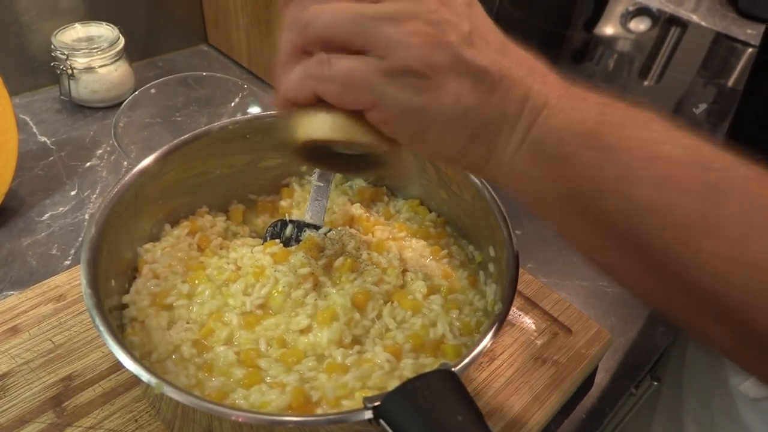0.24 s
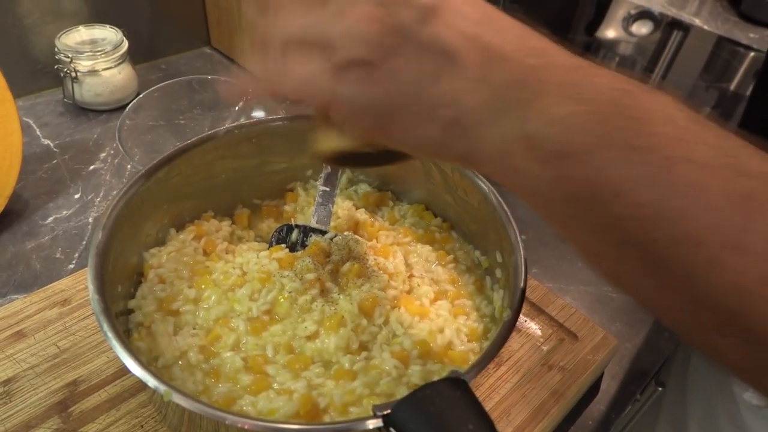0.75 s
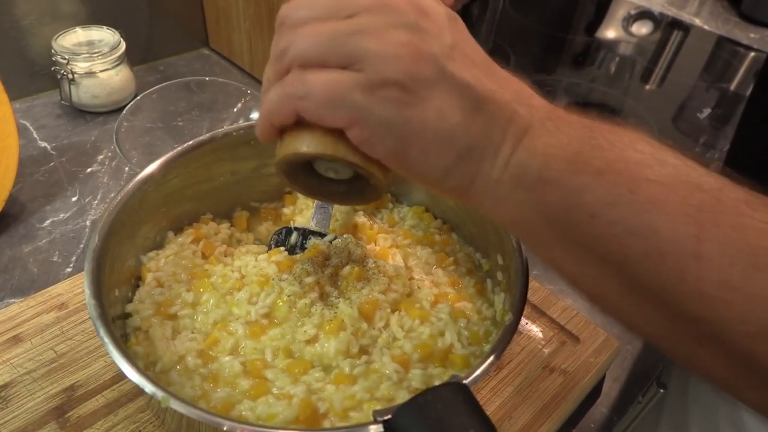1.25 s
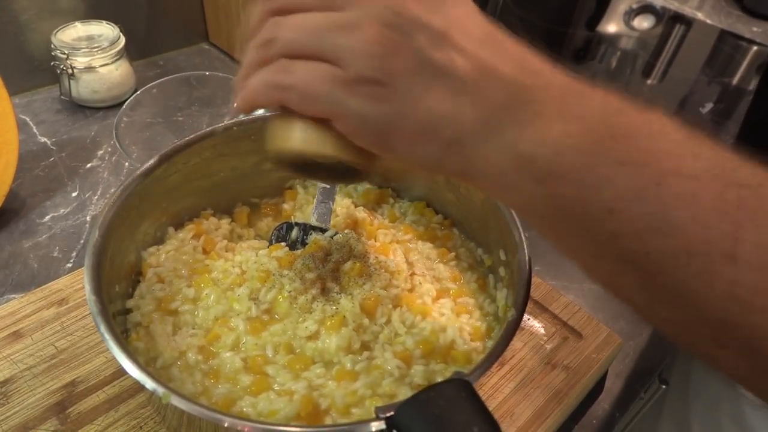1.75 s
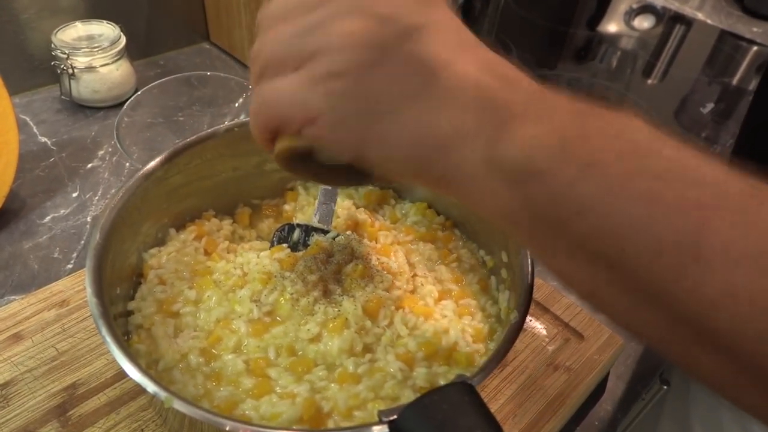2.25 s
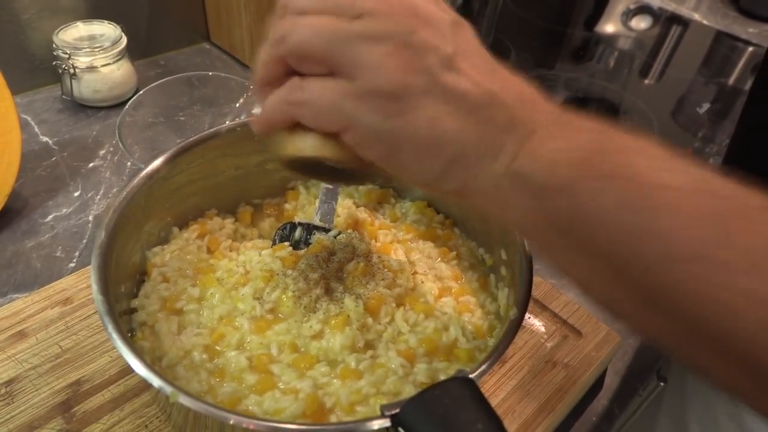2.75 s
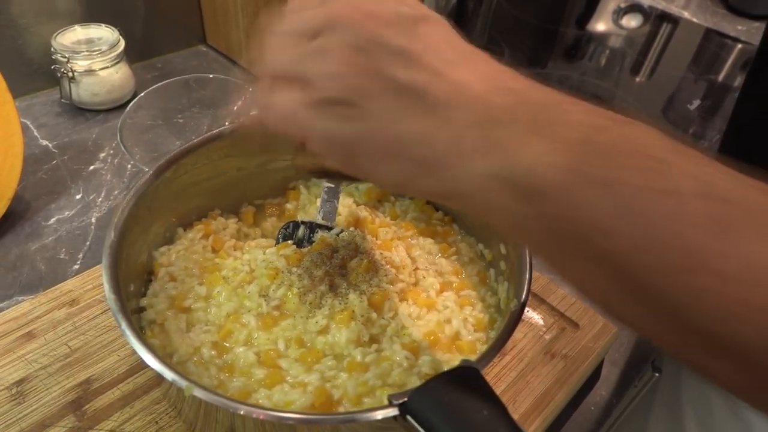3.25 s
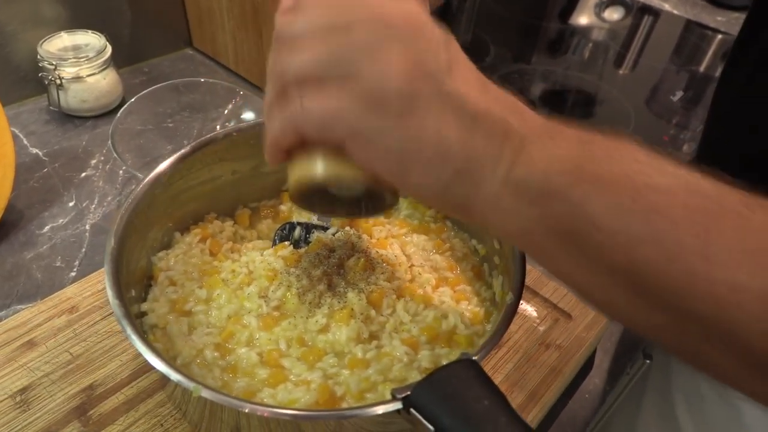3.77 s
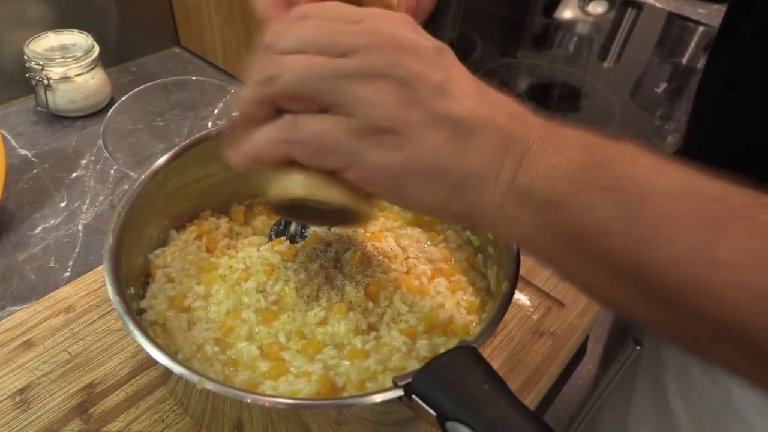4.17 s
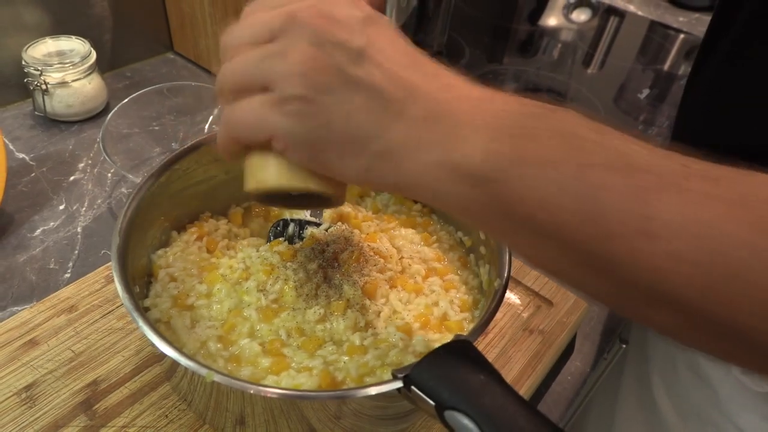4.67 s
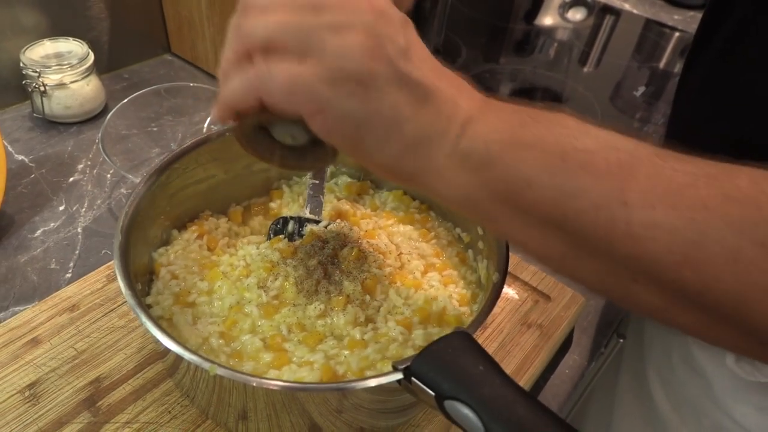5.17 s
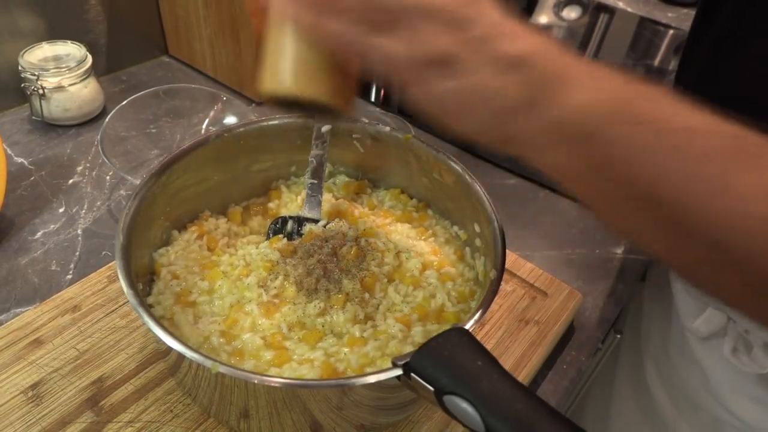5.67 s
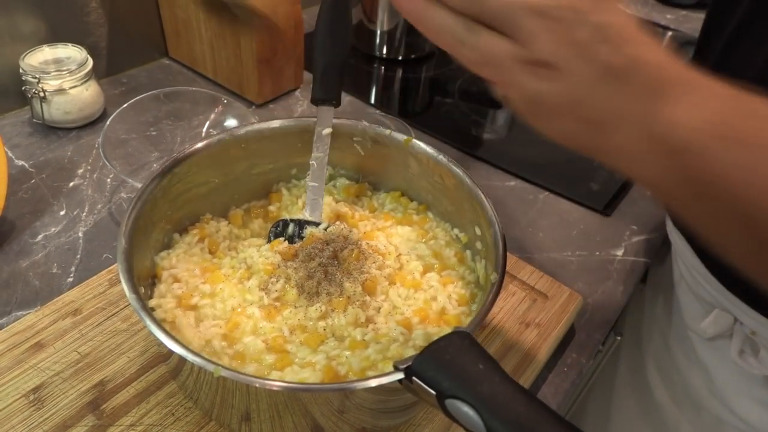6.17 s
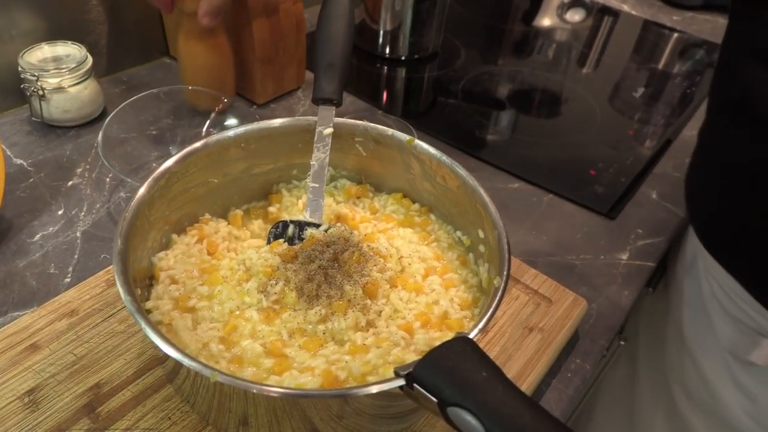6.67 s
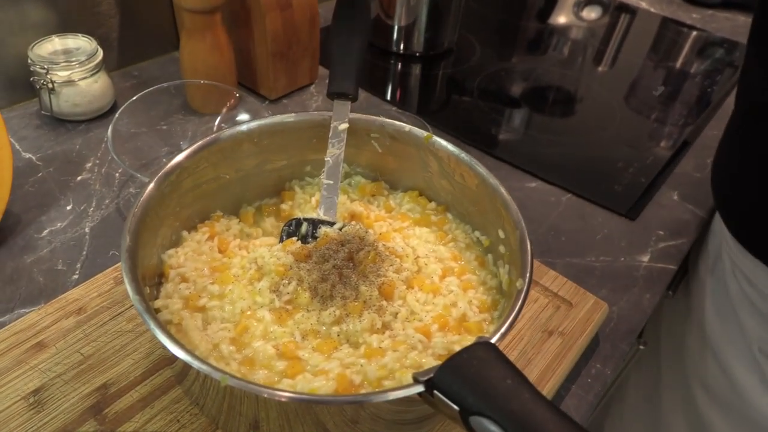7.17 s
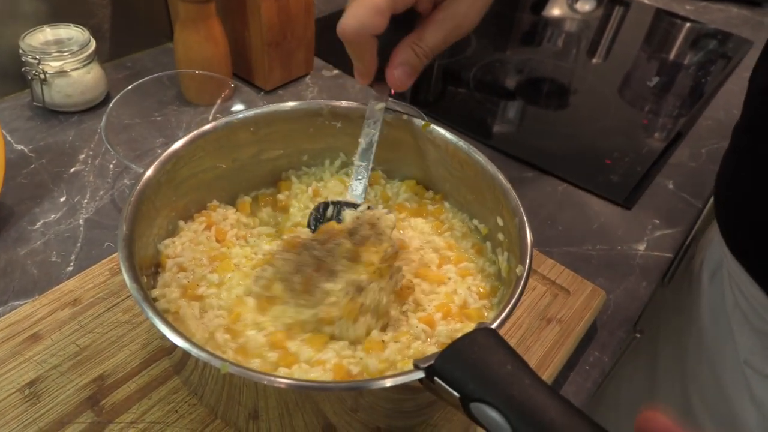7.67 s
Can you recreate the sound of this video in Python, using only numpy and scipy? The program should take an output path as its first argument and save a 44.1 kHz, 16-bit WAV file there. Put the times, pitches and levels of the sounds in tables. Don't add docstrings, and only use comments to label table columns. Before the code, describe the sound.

In a small hard-surfaced kitchen with very faint appliance hum and hiss, a wooden pepper mill is worked close to the microphones. From 0.1 to 5.6 seconds come sixteen short twists, roughly one every 0.35 seconds, each a dry mid-high crunch under a tenth of a second: peppercorns cracking, burr and wood ringing briefly, uneven sharp snaps and tiny treble ticks. Between twists there is a light fingertip tick and a soft rustle as the hand slides back. At 5.9 and 6.05 two soft, low palm pats make the corns rattle. After a pause, the mill's edge touches the counter at 6.6 with a woody tap, then the base lands at 6.8 with a hard, hollow knock, the loudest event, and rocks softly at 7.0. From 7.37 to 7.8 a spoon scrapes through wet rice in two pushes, with light taps and small sticky pops.

```python
import sys
import numpy as np
from scipy import signal
from scipy.fft import rfft, irfft, next_fast_len
from scipy.io import wavfile

SR = 44100
rng = np.random.default_rng(int(sys.argv[2]) if len(sys.argv) > 2 else 0)


def generate_wav(sig):
    pcm = np.round(np.clip(np.atleast_2d(sig).T, -1, 1) * 32767).astype(np.int16)
    wavfile.write(sys.argv[1], SR, pcm)


def magnitude_from_level(level_db):
    exponent = np.asarray(level_db, float) / 20
    return 10 ** exponent


N = 349051


def unit(x):
    return x / np.sqrt(np.mean(x ** 2) + 1e-20)


def along(points, hz):
    f, v = np.transpose(points)
    return np.interp(np.log(hz + 1), np.log(f + 1), v)


def filtered(x, response):
    m = next_fast_len(N + SR // 2)
    return irfft(rfft(x, m) * response(np.fft.rfftfreq(m, 1 / SR)), m)[..., :N]


def colour(points):
    def response(hz):
        cep = irfft(np.log(magnitude_from_level(along(points, hz))))
        cep[1:len(cep) // 2] *= 2
        cep[len(cep) // 2 + 1:] = 0
        return np.exp(rfft(cep))
    return response


def ring(modes):
    def response(f):
        total = 0
        for k, (centre, width, db) in enumerate(modes):
            damping = 1j * f * width
            total = total + (-1) ** k * magnitude_from_level(db) * damping / (centre * centre - f * f + damping)
        return total
    return response


def train(times, sizes):
    at = np.clip(times * SR, 0, N - 1).astype(int)
    return np.bincount(at.ravel(), sizes.ravel(), N)


def crackle(rate, spread_db):
    draw = rng.random((3, N))
    sign = np.sign(draw[1] - .5)
    return unit((draw[0] < rate / SR) * sign * magnitude_from_level(-spread_db * np.log(draw[2] + 1 / 20)))


def crackle_pair(rate, spread_db):
    return [crackle(rate, spread_db) for _ in "LR"]


def push(s, ms):
    u = np.maximum(np.arange(N) / SR - s, 0) * 1000 / ms
    return u ** 2 * np.exp(2 - 2 * u)


# frequency in Hz, gain in dB.
SPLINTER = [(2500, -57.5), (3700, -2), (4600, -3.5), (6000, -6.5), (8000, -8.5), (11000, -12), (14000, -24),
            (16500, -28)]


def ticks(times, dbs, tones_hz, tone, gain_db, life_s, spectrum=SPLINTER):
    out, t = np.zeros((2, N + SR)), np.arange(800) / SR
    for s, db, hz in zip(times, dbs, tones_hz):
        snap = tone * np.sin(2 * np.pi * hz * t) + rng.standard_normal((2, len(t)))
        start = round(s * SR)
        out[:, start:start + len(t)] += magnitude_from_level(db + gain_db) * snap * t / life_s * np.exp(-t / life_s)
    return filtered(out[:, :N], colour(spectrum))


# frequency in Hz, density in dB per Hz.
AIR_SPECTRUM = [(15, -30), (25, 3.5), (40, -25), (70, -11.5), (120, -4), (160, 8.5), (190, -9), (300, -1),
                (500, -3.5), (900, -10), (2200, -14.5), (5000, -24), (10500, -28), (16000, -42)]
# frequency in Hz, left over right in dB.
AIR_BALANCE = [(60, 20), (180, -4.5), (550, -4), (1650, -14.5), (4970, -8), (15000, 4)]
# frequency in Hz, left-right correlation.
AIR_ALIKE = [(30, -1.04), (70, -0.29), (240, 0.67), (950, 0.51), (3770, -0.22), (15000, 0.15)]
AIR_DB = -60.5


def air():
    def mid_side(hz):
        angle = np.arccos(np.clip(along(AIR_ALIKE, hz), -1, 1)) / 2
        return magnitude_from_level(along(AIR_SPECTRUM, hz)) * [np.cos(angle), np.sin(angle)]
    mid, side = filtered(rng.standard_normal((2, N)), mid_side)
    pair = filtered([mid + side, mid - side], lambda hz: magnitude_from_level(along(AIR_BALANCE, hz) * [[.5], [-.5]]))
    return magnitude_from_level(AIR_DB + 2.0) * unit(pair)


# frequency in Hz, t60 in seconds.
KITCHEN_T60 = [(100, 0.041), (400, 0.45), (1500, 0.62), (4000, 0.5), (10000, 0.6)]
# frequency in Hz, level in dB.
ROOM_LEFT = [(100, -4.5), (400, -14.5), (1000, -12.5), (2500, -12.5), (8000, -19)]
ROOM_RIGHT = [(100, -12), (400, -7), (1000, -6.5), (2500, -4), (8000, -11)]
# frequency in Hz, left-right correlation.
ROOM_ALIKE = [(250, 1), (500, 0.73), (1000, 0.25), (2000, 0.055)]


def room(x):
    size, hop = 512, 128
    hz, _, heard = signal.stft(x, SR, nperseg=size, noverlap=size - hop)
    power = np.mean(np.abs(heard) ** 2, axis=0)
    keep = magnitude_from_level(-120 * hop / SR / along(KITCHEN_T60, hz))
    power = np.array([signal.lfilter([1 - k], [1, -k], p) for k, p in zip(keep, power)])
    z = signal.stft(rng.standard_normal((2, N)), SR, nperseg=size, noverlap=size - hop)[2]
    alike = np.clip(along(ROOM_ALIKE, hz), 0, 1)[:, None]
    rms = np.sqrt(np.mean(np.abs(z) ** 2))
    z = np.array([z[0], alike * z[0] + np.sqrt(1 - alike ** 2) * z[1]]) / rms
    wet = signal.istft(z * np.sqrt(np.abs(power)), SR, nperseg=size, noverlap=size - hop)[1]
    wet = np.pad(wet, ((0, 0), (size // 2, 0)))[:, :N]
    return filtered(wet, lambda hz: magnitude_from_level([along(ROOM_LEFT, hz), along(ROOM_RIGHT, hz)]))


# time in seconds, drag in dB.
STIR = [
    (7.368, -50.5),
    (7.387, -48.5),
    (7.415, -54.5),
    (7.49, -57),
    (7.55, -63),
    (7.62, -69),
    (7.66, -55),
    (7.721, -59.5),
    (7.79, -73),
]
# time in seconds, peak in dB, pitch in Hz.
POPS = [(7.402, -43, 7000), (7.4693, -34, 5640), (7.4705, -41, 7860), (7.473, -38, 2300),
        (7.524, -32.5, 4330), (7.5798, -30.5, 4900), (7.645, -39, 4830), (7.6455, -53, 8000),
        (7.654, -37, 1900), (7.6645, -43, 10000), (7.698, -52, 8100), (7.719, -41, 5760),
        (7.727, -43, 6100), (7.821, -44, 4380)]
# frequency in Hz, width in Hz, gain in dB.
SPOON = [(247, 160, 6.5), (650, 570, 4.5), (2150, 970, 6), (3030, 1900, -7.5)]
# frequency in Hz, gain in dB.
WET = [(1000, -11), (2000, -5.5), (8000, -8), (16000, -20)]
FIZZ_DB = -18


def stir():
    s, db = np.transpose([(STIR[0][0] - .01, -120)] + STIR + [(N / SR, -90)])
    scrape_db = np.interp(np.arange(N) / SR, s, db, right=-120)
    scrape = filtered(crackle_pair(900, spread_db=4.0), ring(SPOON))
    fizz = filtered(crackle_pair(1200, spread_db=5.0), colour(SPLINTER))
    drag = magnitude_from_level(scrape_db - 4.0) * unit(scrape) + magnitude_from_level(scrape_db + FIZZ_DB + 2.5) * unit(fizz)
    return drag + ticks(*np.transpose(POPS), tone=3.0, gain_db=-2.5, life_s=0.00042, spectrum=WET)


# time in seconds, level in dB, contact in ms, click in dB.
KNOCKS = [
    (6.602, -23.5, 0.45, -15.5),
    (6.8113, -11.5, 0.27, -42),
    (6.8136, -14.5, 0.24, -50),
    (6.6045, -46, 0.28, 6),
    (6.993, -30.5, 0.43, -71),
    (7.368, -46, 0.42, -26),
    (7.642, -50.5, 0.21, -30),
    (7.582, -54, 0.19, -27),
    (7.654, -52, 0.14, -10),
]
# frequency in Hz, width in Hz, gain in dB.
COUNTER = [(96, 17, -12), (166, 27, -11), (364, 18, 8.5), (442, 27, 7.5), (574, 42, 6.5), (660, 42, 5.5),
           (780, 80, -1), (1010, 73, -0.5), (1323, 116, 2), (1600, 240, 2), (2200, 270, -3),
           (2900, 430, -13)]
# frequency in Hz, width in Hz, gain in dB.
TILTED = [(180, 40, -0.5), (305, 44, 3), (462, 36, 7), (624, 66, 4.5), (845, 130, -1.5), (1270, 170, -6)]
# frequency in Hz, width in Hz, gain in dB.
RIM = [(2100, 300, -3.5), (2900, 410, 3.5), (3300, 690, 3), (4150, 500, -2.5), (6940, 6400, -9.5)]
# time in seconds, level in dB.
HOLLOW = [
    (6.8114, -12),
    (6.993, -3),
    (7.368, -34),
]


def knocks():
    touch, *flat = [magnitude_from_level(db) * push(s, ms) for s, db, ms, _ in KNOCKS]
    body = filtered(sum(flat), lambda f: sum(ring([mode])(f) for mode in COUNTER))
    body = body - filtered(touch, ring(TILTED))
    click = sum(magnitude_from_level(db + click_db + 25.0) * push(s, 0.052) for s, db, _, click_db in KNOCKS)
    hit = magnitude_from_level(15) * filtered(body, lambda f: (1j * f / (270 + 1j * f)) ** 2) + filtered(click, ring(RIM))
    settle = sum(magnitude_from_level(db) * push(s, 0.68) for s, db in HOLLOW)
    hit += filtered(settle, lambda f: ring([(355, 28, 0)])(f) ** 2)
    splash = sum(magnitude_from_level(db + click_db / 2 - 0.5) * push(s, 1.3) for s, db, _, click_db in KNOCKS)
    hit += filtered(splash * rng.standard_normal(N), colour(SPLINTER))
    return early_echoes(hit)


def early_echoes(hit):
    late_s = np.sort(rng.uniform(0.005, .05, 24)) + rng.normal(0, 0.00028, (2, 24))
    echo = rng.choice([-1, 1], 24) * magnitude_from_level(-7.5 - 470 * late_s)
    edge = filtered(hit, lambda f: (1j * f / (550 + 1j * f)) ** 2)
    return hit + [signal.fftconvolve(edge, train(s, g)[:SR // 10])[:N] for s, g in zip(late_s, echo)]


# time in seconds, level in dB, contact in ms, rattle in dB.
PATS = [
    (5.8826, -33, 1.64, -37.5),
    (6.035, -32, 2, -43),
]
# frequency in Hz, width in Hz, gain in dB.
PALM = [(27.6, 8.2, -2), (92, 46, -1), (337, 1100, -7), (720, 120, 6)]
# frequency in Hz, gain in dB.
RATTLE = [(600, -120), (900, -8), (2000, -8), (3200, -2), (4500, -11), (7500, -9), (11000, -15),
          (16000, -36)]


def pats():
    shove = sum(-magnitude_from_level(db + 12.5) * push(s, ms / 2) for s, db, ms, _ in PATS)
    jump = sum(magnitude_from_level(db) * (push(s, 4.2) + 0.34 * push(s, 21.6)) for s, _, _, db in PATS)
    corns = filtered(crackle_pair(2500, spread_db=5.0), colour(RATTLE))
    palm = sum(filtered(shove, ring([mode])) for mode in PALM)
    return palm * magnitude_from_level([[0], [-4]]) + jump * unit(corns)


# frequency in Hz, width in Hz, gain in dB.
BURR = [(1835, 223, 3.5), (1890, 420, -1), (2125, 480, -2), (2480, 264, 1), (2731, 174, 3.5),
        (3050, 650, 2), (3450, 41, 1.5), (4700, 1300, -24)]
WOOD = [(570, 410, -14.5), (775, 222, -6), (1123, 420, -8), (1484, 420, -14.5)]
# time in seconds, length in ms, level in dB, landing tick in dB.
REGRIP = [(0.028, 47, -54, -39), (0.385, 150, -56.5, -50), (0.702, 190, -60, -50), (1.162, 170, -57, -19.5),
          (1.516, 130, -51, -18.5), (1.876, 100, -52, -23), (2.223, 230, -58, -16.5),
          (2.5639, 61, -48.5, -22), (2.929, 110, -53, -15.5), (3.32, 114, -49, -20.5), (3.65, 65, -50, -25),
          (3.98, 130, -54.5, -23.5), (4.352, 30, -50.5, -20), (4.7047, 30, -49.5, -21),
          (5.066, 91, -50.5, -45), (5.404, 220, -54, -26), (7.08, 81, -63.5, -63)]


def regrip():
    t = np.arange(N) / SR
    slide = np.zeros(N)
    for s, ms, db, _ in REGRIP:
        slide = slide + magnitude_from_level(db) * np.interp(t, s + np.array([-12, 0, ms, ms + 70]) / 1000, [0, 1, 1, 0])
    loose = slide + magnitude_from_level(-54) * np.interp(t, [5.55, 5.75], [1, 0])
    hiss = filtered(crackle_pair(3000, spread_db=6.0), colour(SPLINTER))
    body = filtered(crackle_pair(1200, spread_db=5.5), ring(BURR + WOOD))

    def low(f):
        rumble = ring([(26, 12, 4)])(f) ** 2 * magnitude_from_level([[0], [-14]])
        return ring([(70, 70, 0)])(f) ** 2 + rumble
    brush = filtered(rng.standard_normal((2, N)), low)
    return loose * (magnitude_from_level(-8.5) * unit(hiss) + magnitude_from_level(-8.0) * unit(body)) + slide * magnitude_from_level(-10.5) * unit(brush)


# frequency in Hz, gain in dB.
SKIN = [(1800, -35), (2900, 2), (4200, -17), (7500, -3.5), (11000, -4), (14000, -17), (16500, -34)]


def fingertips():
    s, _, _, db = np.transpose(REGRIP)
    return ticks(s, db, 0 * s, tone=0, gain_db=-7.0, life_s=0.0026, spectrum=SKIN)


# time in seconds, peak in dB.
TICKS = [(0.137, -5.5), (0.179, -12), (0.196, -17), (0.464, -24), (0.8053, -15), (1.107, -24), (1.256, -15),
         (1.3674, -23), (1.966, -2.5), (1.982, -7), (2.25, -24), (2.322, -7), (2.472, -22.5),
         (2.7096, -5.5), (3.002, -12.5), (3.086, -8.5), (3.6162, -29), (3.687, -22), (4.3647, -18.5),
         (4.414, -17), (4.478, -2.5), (4.681, -26), (4.7224, -17.5), (5.078, -31), (5.4674, -40),
         (5.5134, 0.5), (5.887, -37), (5.8954, -49), (6.0445, -32), (6.0548, -13)]


def shell_ticks():
    s, db = np.transpose(TICKS)
    return ticks(s, db, 0 * s, tone=0, gain_db=-2.5, life_s=0.0011)


# time in seconds, peak in dB.
SNAPS = [(0.0511, -56), (0.0596, -55), (0.7541, -54), (0.8176, -52), (0.8905, -42), (1.162, -53),
         (1.189, -48), (1.263, -43), (1.3236, -50), (1.5154, -51), (1.615, -40), (1.626, -48),
         (1.9023, -48), (1.9221, -48), (2.223, -41.5), (2.3863, -53), (2.4567, -57), (2.566, -47.5),
         (2.5872, -47), (2.6663, -49), (2.7345, -44), (2.9197, -49), (2.9318, -49), (3.0483, -48),
         (3.3217, -50), (3.3601, -45), (3.3807, -46), (3.715, -44), (3.765, -47), (3.781, -45),
         (3.9962, -57), (4.0195, -53), (4.0433, -51), (4.352, -56), (4.3827, -51), (4.4537, -45),
         (4.4632, -36), (4.594, -49), (4.739, -45), (4.7665, -47), (4.7826, -45), (4.8271, -56),
         (5.1436, -60), (5.4329, -53), (5.4931, -51)]


def chip_snaps():
    s, db = np.transpose(SNAPS)
    return ticks(s, db, 0 * s, tone=0, gain_db=26.0, life_s=0.0005)


# time in seconds, peak in dB.
HUSKS = [(0.1356, -44), (0.1935, -38), (0.8036, -34), (1.1613, -42), (1.2446, -39), (1.3234, -37),
         (1.5145, -45), (1.9016, -44), (1.9659, -29), (2.2223, -36), (2.3206, -37), (2.4563, -53),
         (2.4718, -47), (2.565, -37), (2.7092, -28), (2.9257, -32), (3.0016, -43), (3.0784, -37),
         (3.3054, -46), (3.3214, -39), (3.3573, -41), (3.7763, -34), (4.351, -41), (4.4149, -42),
         (4.4528, -41), (4.4767, -30), (4.6803, -51), (4.7037, -49), (5.1432, -42), (5.5134, -37)]
# frequency in Hz, gain in dB.
HUSK_SPECTRUM = [(5000, -40), (8500, -6), (11000, 5), (14000, -4), (16500, -9)]


def husks():
    s, db = np.transpose(HUSKS)
    return ticks(s, db, 0 * s, tone=0, gain_db=6.0, life_s=0.0004, spectrum=HUSK_SPECTRUM)


# bite in seconds, length in ms, level in dB, pitch in Hz, take-up in dB re level.
TWISTS = [(0.137, 68, -36, 2900, -32), (0.532, 48.6, -35.5, 2680, -11.5), (0.887, 56.4, -34.5, 2300, -13),
          (1.234, 75, -34, 2690, -25), (1.608, 48.3, -37, 2230, -8.5), (1.961, 43, -37.5, 2250, -13),
          (2.32, 40.2, -37, 2100, -9.5), (2.64, 81, -37, 2370, -18), (3.002, 89, -37.5, 2220, -18),
          (3.362, 87, -31.5, 2400, -20.5), (3.752, 46, -37, 2200, -6), (4.072, 74.7, -36, 2310, -14.5),
          (4.415, 71, -38, 2240, -20), (4.774, 63.5, -37, 2430, -17.5), (5.125, 45.7, -33.5, 2570, -19),
          (5.481, 73.6, -38, 2320, -15.5)]
# wood in dB, splinters in dB.
GRIP = [(1.5, 5), (-0.5, -2.5), (2.5, 1.5), (-2, -4), (2.5, 1), (1.5, -0.5), (4, 4.5), (3, 2), (3, 2),
        (0.5, -2.5), (3.5, 3), (2.5, -2), (3.5, 1.5), (2.5, 0), (0, -0.5), (3.5, 2.5)]
# time in seconds, length in ms, level in dB, pitch in Hz, wood in dB.
BREAKS = [(0.1808, 4, -25, 2340, -15), (0.939, 4.3, -35, 2040, -3.5), (1.969, 5.3, -29.5, 2070, -13),
          (2.71, 4.63, -22.5, 1780, -4), (3.079, 6.7, -30.5, 2150, 0.5), (3.357, 7.4, -33.5, 2200, -4.5),
          (3.361, 4.2, -29.5, 2380, -10.5), (3.39, 7.4, -31.5, 2500, -11), (3.429, 15.4, -42.5, 2620, -0.5),
          (3.776, 8, -33.5, 1960, -3.5), (4.1, 9.7, -36, 2600, -2.5), (4.108, 7.1, -31, 2200, -3),
          (4.478, 6, -31, 1940, -2), (5.512, 7.6, -30.5, 2590, -5), (5.52, 4.5, -32.5, 2440, -9),
          (5.522, 27, -43, 4700, -16), (0.5374, 4, -33.5, 3100, -8), (0.551, 5, -34.5, 3000, -8),
          (1.278, 10.6, -40, 2660, -9), (5.163, 12.2, -34, 2540, -9), (4.775, 6.1, -35, 2340, -19),
          (2.64, 4.8, -40, 2300, 2.5), (2.321, 9.8, -33, 2000, -5)]
# time in seconds, length in ms, level in dB, pitch in Hz, wood in dB.
SLIPS = [(0.077, 3.9, -43.5, 1910, -0.5), (0.097, 9.5, -43.5, 2640, -5.5), (0.743, 6.8, -45, 2550, 0.5),
         (0.804, 22, -51.5, 2900, -24), (0.848, 5, -46, 2500, -1), (1.15, 22, -54, 3030, -25),
         (1.198, 9.9, -50.5, 2400, -2.5), (2.572, 25, -50.5, 3400, -25), (2.217, 18.6, -50.5, 2610, -18),
         (3.179, 9.6, -49, 1980, 7), (3.565, 16, -43.5, 1880, -4), (3.713, 7.6, -42.5, 2450, -6),
         (4.013, 17.6, -46.5, 3000, -37), (4.728, 7.6, -48, 2400, -0.5), (1.9448, 6, -39, 2530, -10),
         (3.31, 22.5, -54, 2940, -25), (2.199, 4.1, -46, 1800, -6), (2.325, 20, -43, 4800, -17)]
# time in seconds, level in dB, pitch in Hz, wood in dB.
CRACKS = [(0.1373, -37, 2950.0, -4), (0.163, -37, 2760.0, -3.5), (0.1933, -36, 2720.0, -10),
          (0.2394, -51, 2530.0, -11), (0.5015, -43, 2790.0, -2.5), (0.5355, -38, 3000.0, -6),
          (0.5585, -39, 2240.0, -18), (0.8997, -42, 2610.0, -2), (0.917, -40, 2140.0, -9),
          (1.2328, -40, 2150.0, -21), (1.2434, -36, 2820, -27), (1.2639, -34.5, 2480, -13),
          (1.283, -35.5, 2250.0, -9), (1.2949, -32.5, 3070.0, -16), (1.3137, -43, 2920.0, -8),
          (1.589, -45, 1910.0, -10), (1.6114, -38, 2040.0, -3), (1.6263, -38.5, 2310.0, -1),
          (1.6324, -44, 2500.0, -6), (1.6456, -40, 2480.0, -6), (1.9194, -42.5, 2760.0, 0),
          (1.956, -38, 2540.0, -7), (1.982, -35.5, 2020.0, -5.5), (2.0032, -37, 2600, -5.5),
          (2.65, -46, 2100.0, -10), (2.6686, -44, 2720.0, -1), (2.6831, -36, 2570, -9),
          (3.0062, -38.5, 2780.0, -3), (3.024, -36.5, 1870.0, -10), (3.034, -40.5, 2610.0, -2),
          (3.105, -45, 2250.0, -12), (3.404, -32, 2520.0, -12), (3.7195, -44, 2630.0, 3),
          (3.7573, -38.5, 2390.0, -7), (3.7652, -38.5, 2480.0, -4), (3.79, -53, 2560.0, -10),
          (4.018, -45, 2870.0, -10), (4.081, -38.5, 2510.0, -12), (4.1272, -38.5, 2390, -10),
          (4.1347, -41, 2470.0, -10), (4.4153, -43, 2380, 4), (4.4333, -41, 2070.0, 1),
          (4.445, -36, 2220.0, -5), (4.7856, -40.5, 2440.0, -9), (4.8013, -38.5, 2520.0, 1),
          (4.8104, -36, 2410, -9), (4.8281, -35, 2720.0, -8), (5.1309, -33, 2540.0, -15),
          (5.145, -38, 2430.0, -9), (5.4959, -36, 1940.0, -10)]
TAKE_UP_MS, LET_GO_MS, LET_GO_DB = 36, 17, -22.5
ARCH_DB, UNEVEN_DB = 4.5, 1
SAG, STRAY = 0.05, 0.042
WOOD_DB, SPLINTER_DB, COLOUR_DB = -4.5, -12, 2
USUAL_DB, WOOD_LAGS, SPLINTER_LAGS = -40, 0.78, 0.27
CRACK_MS, BED_DB, OVERLAP = 6, -5, 1.3


def crushes(count=4):
    s, ms, db, hz, slack_db = np.transpose(TWISTS)[:, :, None]
    part = (np.arange(count) + .5) / count
    chance = rng.standard_normal((len(s), 5, count + 2))
    start = np.hstack([s - TAKE_UP_MS / 1000, s + (part - part[0]) * ms / 1000, s + ms / 1000])
    start[:, 2:] += np.tanh(chance[:, 4, 2:]) * ms / count / 3000
    length = np.hstack([TAKE_UP_MS + 0 * s, OVERLAP * ms / count + 0 * part, LET_GO_MS + 0 * s])
    bite_db = ARCH_DB * (np.sin(np.pi * part) - 1) + BED_DB + 0 * s
    level = db + np.hstack([slack_db, bite_db, LET_GO_DB + 0 * s]) + UNEVEN_DB * chance[:, 0]
    pitch = hz * (1 - SAG * np.linspace(-1, 1, count + 2) + STRAY * chance[:, 1])
    grip_wood, grip_splinter = np.transpose(GRIP)[:, :, None]
    over_db = level - USUAL_DB
    wood = WOOD_DB + grip_wood - WOOD_LAGS * np.maximum(over_db, 0) + COLOUR_DB * chance[:, 2]
    splinter = SPLINTER_DB + grip_splinter - SPLINTER_LAGS * over_db + COLOUR_DB * chance[:, 3]
    twists = np.reshape([start, length, level, pitch, wood, splinter], (6, -1)).T
    single = np.array(BREAKS + SLIPS + [(s, CRACK_MS, *rest) for s, *rest in CRACKS])
    single_splinter = SPLINTER_DB - SPLINTER_LAGS * (single[:, 2] - USUAL_DB)
    return np.vstack([twists, np.column_stack([single, single_splinter])])


SWELL_DB, FADE_DB = 7, 4.5
GRIP_DETUNE = 0.042


def grind(rate, spread_db, mode_db, focus_db):
    s, ms, db, hz, wood_db, splinter_db = np.transpose(crushes())[:, :, None]
    draw = rng.random((len(s), 3, 80))
    first = np.arange(80) == 0
    later = np.arange(80) > 0
    used = np.arange(80) < 1 + rate * ms / 1000
    times = s + draw[:, 0] * ms / 1000 * later
    size = used * magnitude_from_level(-spread_db * np.log(draw[:, 2] + 0.29) + 55 / ms * first)
    gone = (times - s) * 1000 / ms
    size *= magnitude_from_level(np.where(ms == TAKE_UP_MS, SWELL_DB, -FADE_DB) * gone)
    size *= magnitude_from_level(db) * np.sqrt(ms / 1000 * SR / np.sum(size ** 2, axis=1, keepdims=True))

    out = np.zeros((2, N + SR))
    grips = [0] + [round((row[0] - .1) * SR) for row in TWISTS[1:]] + [6 * SR]
    for k, mode in enumerate(BURR + WOOD):
        mode_hz, width_hz, mode_gain_db = mode
        gain_db = wood_db + 23.5 if mode in WOOD else 15.5 - focus_db * np.log2(mode_hz / hz) ** 2
        scatter_db = rng.normal(0, mode_db, size.shape) * (0.41 + 0.6 * later)
        blow = size * magnitude_from_level(gain_db + mode_gain_db + scatter_db)
        turn = np.pi * k + later * rng.uniform(0, 2 * np.pi, size.shape)
        facing = np.cos(turn + rng.normal(0, 1.0, (2,) + size.shape))
        force = np.array([train(times, blow * f) for f in facing])
        for a, b in zip(grips, grips[1:]):
            peak = signal.iirpeak(mode_hz * (1 + GRIP_DETUNE * rng.normal()), mode_hz / width_hz, SR)
            held = np.pad(force[:, a:b], ((0, 0), (0, SR // 20)))
            out[:, a:b + SR // 20] += signal.lfilter(*peak, signal.lfilter(*peak, held))

    decay = np.exp(-1 / (0.0051 * SR))
    crumble = signal.lfilter([1], [1, -decay], train(times, size * magnitude_from_level(splinter_db - 14.5)))
    chips = filtered(crumble * rng.standard_normal((2, N)), colour(SPLINTER))
    shake = [train(times, size * magnitude_from_level(wood_db + 5.5) * rng.normal(size=size.shape)) for _ in "LR"]
    jolt = filtered(shake, ring([(85.5, 304, -2.0), (304, 360, 3.5)]))
    return out[:, :N] + chips + jolt


# frequency in Hz, gain in dB.
RIGHT_MIC = [(40, -13.5), (150, -7), (400, -1), (800, 3), (2500, 6), (4000, 4), (6500, 2.5), (7700, 11.5),
             (9000, 1.5), (12000, -2.5), (15000, -14)]
LEFT_LAG_S, KNOCK_LEFT_DB = -0.000096, -4.5


def scene():
    corns = fingertips() + shell_ticks() + chip_snaps()
    mill = grind(rate=800, spread_db=5.0, mode_db=4.5, focus_db=23)
    near = mill + regrip() + corns + pats() + stir()
    far = knocks()
    left, right = near + far * magnitude_from_level([[KNOCK_LEFT_DB], [0]]) + room(near + magnitude_from_level(4.5) * far)
    left = filtered(left, lambda hz: np.exp(-2j * np.pi * hz * LEFT_LAG_S))
    return np.array([left, filtered(right, colour(RIGHT_MIC))]) + air() + husks()


# frequency in Hz, gain in dB.
ROLL_OFF = [(9000, 0), (12000, -1), (14500, 3.5), (15800, -3), (16400, -46)]


def top_cut(x):
    return signal.sosfilt(signal.butter(12, 15900, fs=SR, output="sos"), x)


def record(dry):
    mix = filtered(dry, colour(ROLL_OFF))
    return top_cut(mix)


dry = scene()
out = record(dry)
generate_wav(out)
```